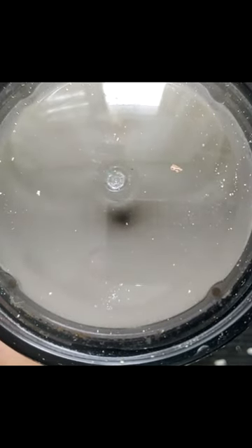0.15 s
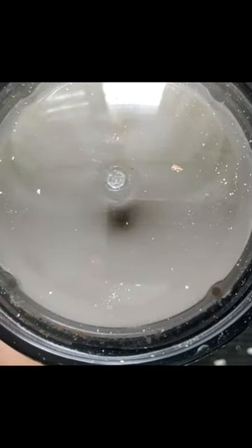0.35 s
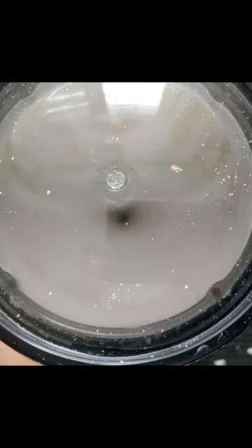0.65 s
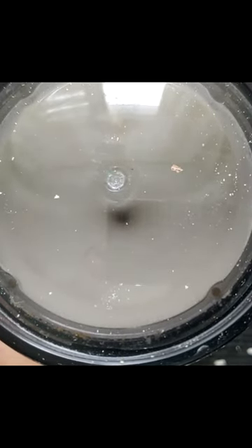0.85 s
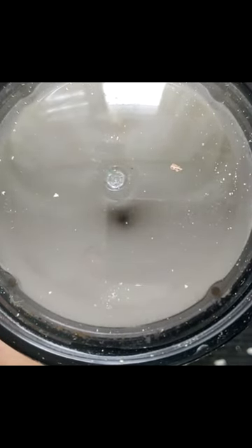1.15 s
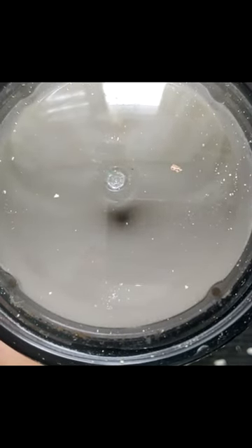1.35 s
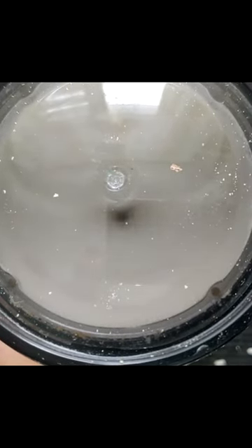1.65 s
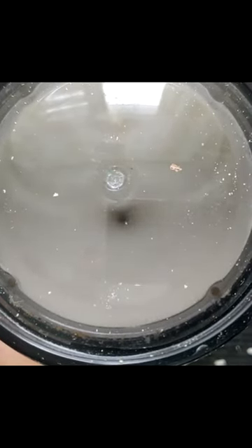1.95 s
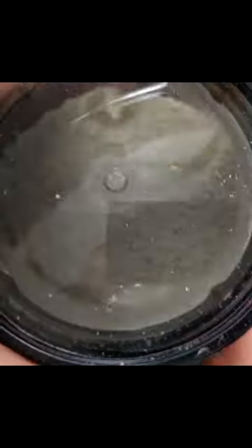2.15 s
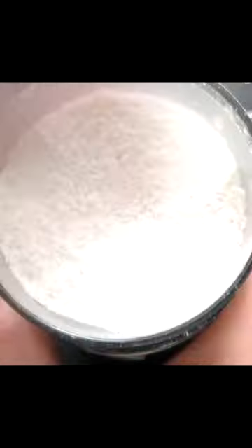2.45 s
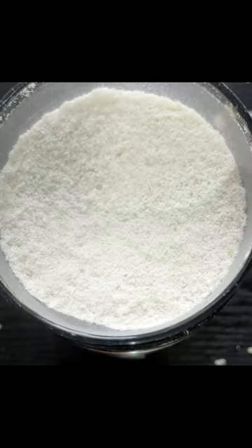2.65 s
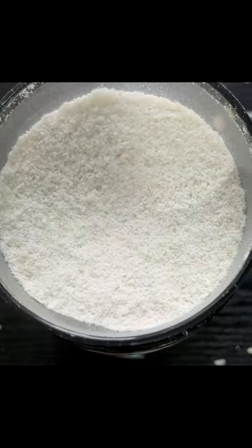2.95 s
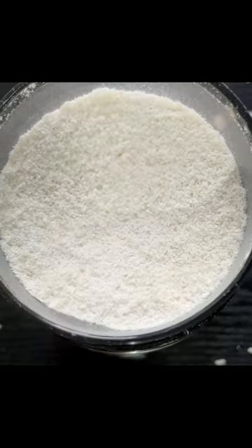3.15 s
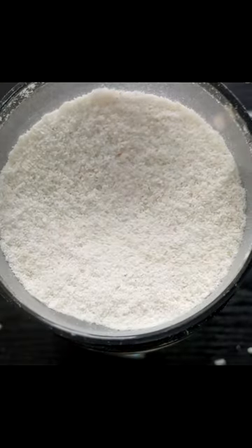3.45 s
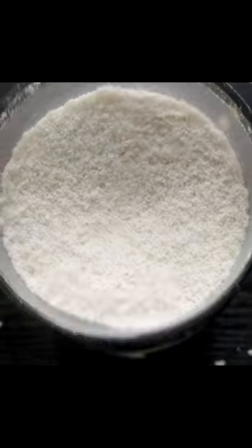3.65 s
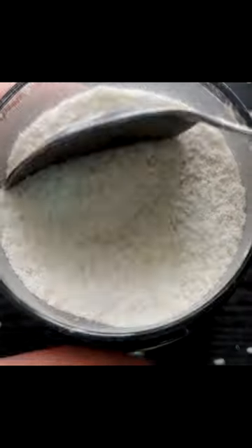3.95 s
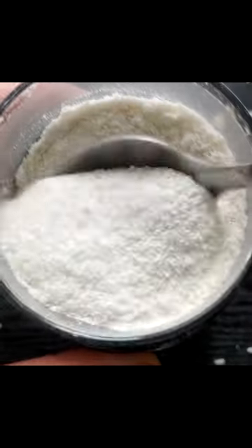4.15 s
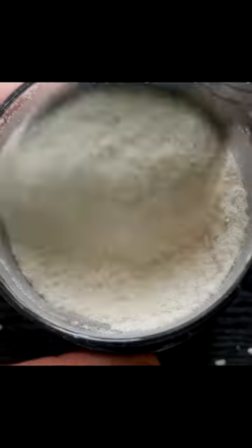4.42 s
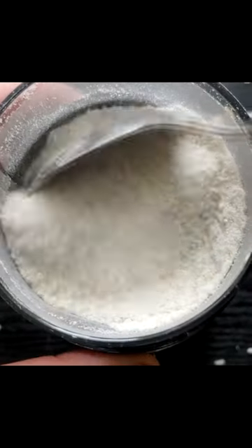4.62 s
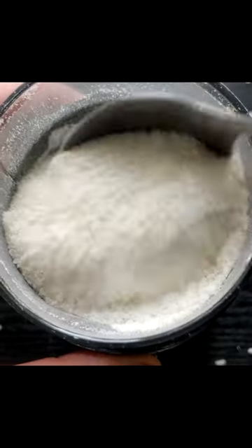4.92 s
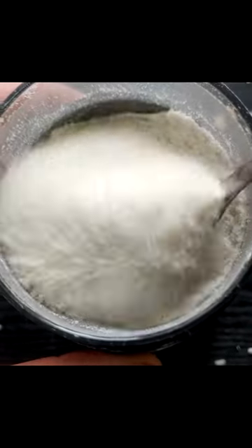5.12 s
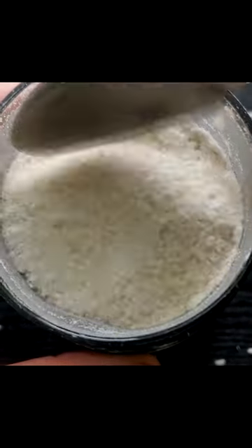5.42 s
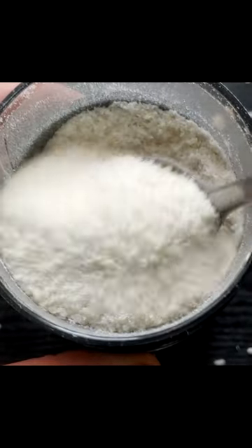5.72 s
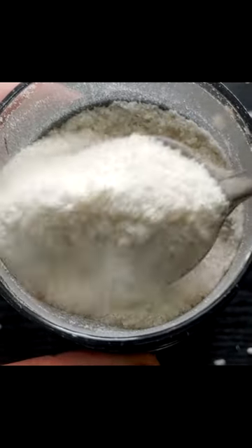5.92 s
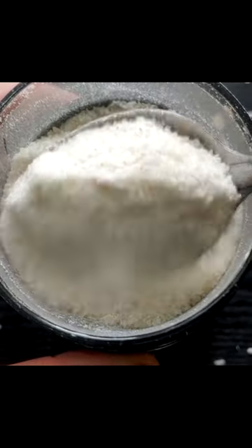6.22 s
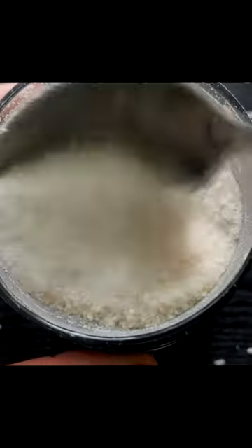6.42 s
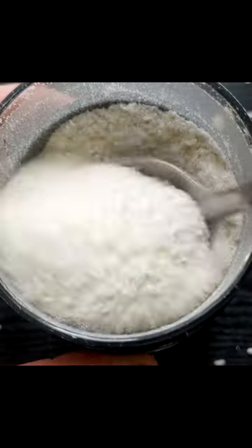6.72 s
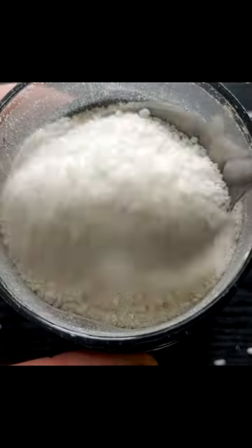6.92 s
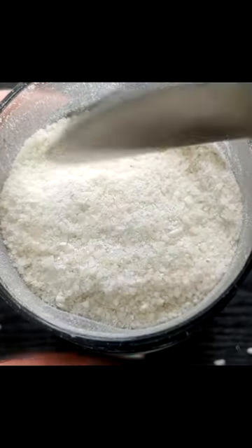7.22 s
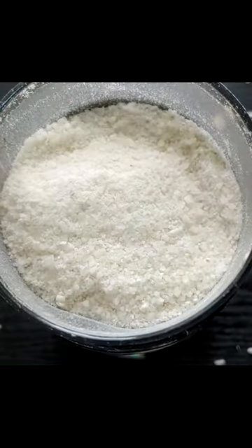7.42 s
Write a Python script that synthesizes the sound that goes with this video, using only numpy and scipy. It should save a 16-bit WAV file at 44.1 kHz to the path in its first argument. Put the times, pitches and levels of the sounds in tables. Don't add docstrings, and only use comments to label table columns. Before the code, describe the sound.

A dense, buzzing grinder full of dry grain runs from the start in a quiet room, steady with a slightly wavering motor pitch, and stops suddenly. One sharp click of the lid catch, small handling touches, a brief lid scrape and a solid plastic clack on the table come next. Then sparse, soft spoon strokes and small dry knocks in a powder-filled cup, recorded close in stereo, with a faint low drone beneath.

```python
import sys
import numpy as np
from scipy import signal
from scipy.fft import rfft, irfft
from scipy.io import wavfile
from scipy.ndimage import uniform_filter1d

SR = 44100
rng = np.random.default_rng(int(sys.argv[2]) if len(sys.argv) > 2 else 0)


def transcribe(signal):
    frames = np.atleast_2d(signal).T
    limited = np.clip(frames, -1, 1)
    pcm = np.round(limited * 32767).astype(np.int16)
    wavfile.write(sys.argv[1], SR, pcm)


def linear_from_db(decibels):
    return 10 ** (np.asarray(decibels, float) / 20)


N = 334278

# freq_hz, density_db [dB per Hz]
AIR_SPECTRUM = [(20, -25.5), (50, -14), (90, -12.5), (160, -22), (300, -22.5), (540, -18), (1120, -25.5),
                (1550, -29), (1900, -37.5), (2700, -39), (4500, -49.5), (7000, -57.5), (10600, -51.5),
                (11800, -75)]
# freq_hz, likeness [-1 to 1]
AIR_LIKENESS = [(60, 0.61), (180, 0.94), (550, -0.13), (1650, -0.28), (4970, -0.4), (15000, 0.4)]
# freq_hz, pan_db
AIR_PAN = [(60, 1), (180, 1), (550, -1), (1650, 3), (4970, 5), (15000, 2)]
# time_s, level_db
ROOM_LEVEL = [(0, -56.5), (2.2, -59.5), (2.66, -60.5), (2.7, -69.5), (7.58, -70)]
# freq_hz, width_hz, level_db [over the air], steady_share [factor beside the fuzz of 1]
DRONE = [(46.08, 12, -15.5, 0.28), (116.5, 8.9, -7, 1.9), (205.5, 20, -10, 0.23)]
# freq_hz, width_hz, gain_db
INLET = [(7330, 460, -18.5), (9700, 2700, 7), (12400, 400, -23.5), (14700, 350, -14)]

# time_s, shaft_hz, whine_db
MOTOR_RUN = [(0, 251.3, -35), (.12, 247.2, -32.5), (.19, 253.2, -34), (.27, 244.6, -34.5),
             (.37, 243.9, -35), (.48, 244.1, -40.5), (.59, 250.7, -33.5), (.66, 244.9, -37),
             (.81, 251.5, -34.5), (.97, 244.5, -35.5), (1.01, 244, -39.5), (1.08, 249.3, -34),
             (1.33, 249, -34), (1.42, 246.3, -36), (1.8, 247.3, -36), (1.9, 243.9, -34), (1.97, 246.6, -35),
             (2.05, 242, -37)]
# order, level_db [over whine], start_db, pan_db, left_lead_rad, waver_db
SHAFT_ORDERS = [(1, -2.5, -1.5, -11.5, 0.64, 0.8), (2, 5.5, -7.5, 0.6, 0.91, 1.5),
                (3, -6, -4, 1.5, 0.94, 4), (4, -3, -6, 9, 0.22, 2.5), (5, 7, -4.5, 5, 0.86, 1),
                (6, -3, 2, 1, 0.16, 3.5)]
# freq_hz, density_db [dB per Hz]
GRAIN_SPECTRUM = [(20, -41.5), (65, -35.5), (108, -24), (160, -35.5), (210, -19.5), (300, -11), (450, -8),
                  (560, -14.5), (1000, -12), (1230, -3), (1560, -7), (2560, -10), (3300, -23), (4290, -62)]
# freq_hz, density_db [dB per Hz]
GRIT_SPECTRUM = [(2000, -30), (3300, -2.5), (3550, 1), (3820, 5), (4300, -12), (4900, -23), (5450, -13.5),
                 (5850, -26), (6250, -13.5), (7000, -23), (9500, -14), (11500, -19.5), (13600, -22.5),
                 (14400, -23.5), (15100, -21), (15700, -21.5)]
# freq_hz, width_hz, gain_db
HOUSING_MODES = [(600, 77, 10.5), (698, 55, 6), (848.5, 140, 7.5), (1120, 220, -2.5), (1380, 260, 4),
                 (1690, 60, 4.5), (1880, 190, 4), (2093, 34, 7), (2547, 100, 7)]
# freq_hz, likeness [0-1]
CHURN_LIKENESS = [(60, .97), (170, .8), (320, .97), (700, .94), (900, .8), (1250, .93), (1600, .65),
                  (2000, .75), (2280, .15), (2700, .6), (3200, .6), (3500, .2), (3820, .9), (4400, .2),
                  (6300, .55), (7200, .2), (9000, .4), (14500, .45)]
# freq_hz, lead_rad
CHURN_LEAD_RAD = [(60, .1), (250, .5), (350, .2), (700, .6), (1400, .4), (1800, 1.7), (2250, 0),
                  (2500, -3.3), (2900, -.7), (3400, -3), (3800, -5), (4500, -4.8), (6300, -7), (9000, -5.3),
                  (15000, -6.3)]
# freq_hz, pan_db
CHURN_PAN_DB = [(60, -11), (170, -6.5), (250, 0.5), (330, 4.5), (900, 5.5), (1400, -0.5), (2400, 10.5),
                (3100, 0.55), (3800, -3), (5000, -10.5), (6200, 11), (7200, 1), (15000, -3.5)]

# freq_hz, width_hz, level_db
LID_MODES = [(141, 34, 3.5), (252, 52, 8), (416, 170, 5.5), (560, 31, -0.5), (700, 39, 0.5), (960, 36, 1),
             (1310, 70, -11), (1750, 280, -14), (2525, 69, -15), (3030, 120, -26), (3770, 100, -49)]
# freq_hz, width_hz, level_db
CUP_MODES = [(361, 45, -5.5), (650, 75, -0.5), (927, 134, -4.5), (1200, 185, -5), (1490, 190, -1),
             (1970, 120, -12), (2350, 110, -14), (3500, 250, -53)]
# freq_hz, width_hz, level_db
PLASTIC_MODES = [(229, 130, 7.5), (560, 240, 9.5), (1192, 260, 5), (1550, 140, 5), (2005, 240, 9.5),
                 (2740, 38, -27.5), (3640, 130, -7.5)]
# freq_hz, level_db
TICK_SPECTRUM = [(300, -33.5), (1500, -5), (3500, -3), (5500, -6), (7500, -11), (9500, -12), (12000, -17),
                 (13500, -24), (15000, -38.5), (17000, -59.5)]

# time_s, effort_db, grit_db [over effort], rise_s, fall_s
LID_SCRAPES = [
    (2.708, -29.5, -39, .022, 0.12),
    (2.835, -34, -32, 0.032, 0.073),
    (2.865, -40, -30, .05, 0.072),
]
# time_s, effort_db, favoured_hz, rise_s, fall_s
COARSE_RUBS = [
    (2.397, -45.5, 1200, 0.0049, 0.035),
    (2.445, -53.5, 432, .04, 0.088),
    (3.83, -72, 350, .2, 0.084),
    (4.16, -69, 1510, 0.062, 0.042),
    (4.654, -58, 352, .02, .07),
    (4.66, -65, 3100, 0.026, 0.051),
]
# time_s, effort_db, favoured_hz, rise_s, fall_s
FINE_RUBS = [(3.084, -68, 254, 0.063, 0.037), (4.1, -75, 1500, 0.092, .08), (4.22, -69.5, 1400, 0.016, .08),
             (4.352, -54.5, 750, 0.032, 0.038), (4.735, -57, 990, 0.064, 0.047),
             (5.02, -48, 750, .025, 0.064), (5.085, -56.5, 700, .07, 0.096),
             (5.175, -56.5, 1256, 0.069, 0.083), (5.47, -69, 910, 0.087, 0.087),
             (5.585, -65.5, 1510, 0.077, 0.072), (5.616, -45.5, 560, 0.013, 0.078),
             (5.71, -63, 600, .1, 0.082), (5.835, -58.5, 694.4, .08, 0.057),
             (6.665, -59.5, 560, .08, 0.066), (6.74, -71, 1500, 0.092, 0.12),
             (6.84, -61, 650, 0.022, 0.043)]
# time_s, low_db, upper_db, rise_s, fall_s
TABLE_THUDS = [(2.255, -70, -71, 0.01, 0.17), (2.413, -56.5, -66, 0.071, 0.23),
               (2.711, -63, -61, 0.061, 0.6), (2.899, -75, -78, 0.43, .05),
               (3.5734, -32, -37.5, 0.0029, 0.069), (3.632, -57.5, -62.5, 0.025, 0.2),
               (3.953, -62, -65, 0.073, 0.057), (4.652, -57.5, -57, 0.046, 0.23),
               (5.15, -61.5, -65, 0.18, 0.072), (5.646, -54.5, -61.5, .065, 0.4),
               (6.712, -66.5, -68.5, 0.35, 0.33), (7.299, -57, -59.5, .04, 0.12)]
# time_s, peak_db, favoured_hz, tick_db [over peak], decay_ms
SNAPS = [
    (2.3552, -42, 1506, -3.5, 29),
    (2.3659, -29, 1310, -6.5, 95),
    (2.3799, -4.5, 1727, -10, 16),
    (2.385, -31, 1640, -19, 144),
    (2.3901, -21.5, 1420, -10.5, 40),
    (7.2895, -42, 2660, -30, 38),
]
# time_s, peak_db, favoured_hz, tick_db [over peak], decay_ms
CUP_LANDINGS = [
    (3.547, -46, 1380, -33, 46),
    (3.5554, -25, 600, -11.5, 46),
    (3.5667, -4, 1113, -11.5, 12),
    (3.571, -15, 620, -32.5, 21),
    (3.5786, -29.5, 700, -15, 8),
]
# time_s, peak_db, favoured_hz, tick_db [over peak], decay_ms
RIM_KNOCKS = [
    (2.6958, -46, 900, -35, 15),
    (2.7063, -23.5, 800, -35, 9.7),
    (2.7141, -24.5, 910, -38, 9.7),
    (2.8391, -30, 900, -35, 9.2),
    (2.88, -40, 950, -35, 17),
]
# time_s, peak_db, favoured_hz, tick_db [over peak]
FINGER_TAPS = [
    (2.444, -41, 360, -25),
    (2.477, -48.5, 550, -21),
    (3.023, -61, 282, -34),
    (3.061, -66.5, 244, -42),
    (3.289, -59, 560, -15),
]
# time_s, peak_db, favoured_hz, tick_db [over peak]
WALL_TAPS = [(3.93, -47.5, 1490, -34), (4.154, -62, 208, -22), (4.214, -57, 654, -37),
             (4.346, -65, 700, -33), (4.659, -47.5, 640, -25), (4.71, -52, 840, -39),
             (5.023, -50, 654, -34), (5.087, -55, 695, -37), (5.162, -56, 1500, -32),
             (5.279, -78, 202, -11.5), (5.519, -50.5, 346, -38), (5.612, -42, 484, -35),
             (5.622, -41, 616, -21), (5.727, -47, 554, -38), (5.805, -58, 646, -35), (5.831, -58, 740, -33),
             (6.556, -49, 361, -39), (6.623, -47.5, 358, -42), (6.665, -55, 1400, -37),
             (6.689, -53.5, 1550, -37), (6.818, -53, 373, -40), (7.059, -55, 250, -22),
             (7.276, -55, 1516, -32), (7.288, -38, 1510, -35)]
# time_s, peak_db, favoured_hz, tick_db [over peak], decay_ms
EDGE_KNOCKS = [(4.3486, -52, 1270, -25, 20), (4.6451, -41.5, 372, -26, 11), (4.723, -45, 900, -32, 12),
               (4.7359, -36.5, 1050, -42, 8.4), (5.0072, -46, 800, -26, 12), (5.0193, -52, 1400, -30, 10),
               (5.0243, -48, 700, -30, 12), (5.6103, -31.5, 616, -14, 18), (5.6306, -36, 700, -15, 19),
               (6.6505, -47, 605, -30, 13), (6.6615, -41, 560, -28, 16), (7.288, -46, 910, -15, 25.5)]
# time_s, level_db, freq_hz, length_ms
BRUSHED_MODES = [(2.886, -53.5, 289, 54), (3.059, -54, 243, 57), (4.488, -71.5, 1390, 70),
                 (5.163, -87, 4350, 56), (5.271, -81, 3800, 19), (5.521, -62.5, 1490, 24),
                 (5.596, -51, 356, 28), (5.812, -90, 4450, 59), (6.558, -63, 1500, 18),
                 (6.65, -91, 5800, 25), (6.81, -59.5, 372, 56), (6.812, -82, 4364, 12),
                 (6.826, -89, 4330, 15), (4.346, -80, 4540, 20), (4.49, -92, 3500, 63),
                 (5.629, -70, 3700, 14), (5.628, -86, 5640, 12), (3.585, -73, 2710, 33),
                 (7.056, -59, 227, 28), (7.287, -47.5, 356, 16), (7.289, -56, 657, 24)]
# time_s, level_db, rise_s, fall_s
DUST_PUFFS = [(2.459, -80, .04, .05), (2.565, -78.5, .03, .04), (2.77, -70, .03, 0.038),
              (2.85, -75, 0.055, 0.099), (4.66, -69, 0.028, .04), (5.82, -74, .02, 0.034),
              (2.484, -69, .006, .006), (4.722, -78, .006, .008), (5.028, -83.5, .02, .015),
              (5.497, -77, .008, .008), (5.882, -78.5, .008, .01), (7.292, -74.5, .006, 0.034)]
# time_s, level_db, rise_s, fall_s
GRIT_SPRAYS = [(2.372, -70, .006, 0.0091), (2.39, -67, .01, 0.031), (2.478, -73, .01, .015),
               (2.57, -80, .05, 0.055), (4.16, -84, 0.022, .02), (4.354, -82, .015, 0.016),
               (4.66, -70, .03, 0.032), (5.025, -87, .03, 0.019), (5.6, -82, .015, 0.011),
               (5.632, -86, .015, 0.027), (7.292, -78.5, .006, 0.025)]

GRIT_SPECTRUM_DB, CHURN_DB = -24, -29
RUN_S, SETTLE_S = 2.17, .4
FADE_START_S, GLIDE_HZ_PER_S, WHINE_LOSS_DB_PER_S = 2.0367, 120, 251
FADE_S, FADE_DB, FADE_BEND = 0.13, -59, 4.4
EDGE_DB, SHOULDER_DB = -40, -11.5
LID_HZ, TABLE_HZ, TABLE_UPPER_HZ = 950, 57.5, 102
COARSE_GRIT_DB, FINE_GRIT_DB = -6, -19
TAP_DECAY_MS, TICK_LAG_S = 48, .0008
DUST_HZ, SPRAY_HZ, PUFF_WIDTH_HZ = 9500, 5130, 2200


def evened(x):
    return x / np.sqrt(np.mean(x ** 2) + 1e-20)


def read(points, hz):
    f, value = np.transpose(points)
    return np.interp(np.log(hz + 1), np.log(f + 1), value)


def unroll(rows):
    s, *columns = np.transpose(rows)
    t = np.arange(s[0], s[-1], 1 / SR)
    return round(s[0] * SR), [np.interp(t, s, c) for c in columns]


def add(mix, at, sound):
    part = mix[:, at:at + sound.shape[1]]
    part += sound[:, :part.shape[1]]


def panned(db):
    return linear_from_db(np.array([db / 2, -db / 2]))


def bumps(modes, hz):
    return sum(db / (1 + (2 * (hz - f) / w) ** 2) for f, w, db in modes)


def dull(x, hz):
    return signal.sosfilt(signal.butter(N=3, Wn=hz, fs=SR, output="sos"), x)


def resonate(x, hz, width):
    r = np.exp(-np.pi * width / SR)
    return 2 * signal.lfilter([1 - r], [1, -r * np.exp(2j * np.pi * hz / SR)], x).real


def resonate_twice(x, hz, width):
    return resonate(resonate(x, hz, width), hz, width)


def drift(n, hz):
    knots = rng.standard_normal(int(n / SR * 60) + 2)
    return evened(np.interp(np.arange(n) * hz / SR, np.arange(len(knots)), knots))


def stroke(s, rise, fall):
    return [(s - rise, EDGE_DB), (s - rise / 2, SHOULDER_DB), (s, 0),
            (s + fall / 2, SHOULDER_DB), (s + fall, EDGE_DB)]


def hiss(n, shape_db, same, lead, pan_db, patchy_db):
    hz = np.fft.rfftfreq(2048, 1 / SR)
    a, b, c, d, patches = rng.standard_normal((n // 512 + 5, 1025, 5)).T
    patches = uniform_filter1d(patches, size=16, axis=0)
    patches = evened(uniform_filter1d(patches, size=4, axis=1))
    alike = np.clip(read(same, hz), -1, 1)[:, None]
    left = a + 1j * b
    shared = alike * left * np.exp(-1j * read(lead, hz))[:, None]
    right = shared + np.sqrt(1 - alike ** 2) * (c + 1j * d)
    level = linear_from_db(shape_db(hz)[:, None] + patchy_db * patches)
    z = np.array([left, right]) * panned(read(pan_db, hz))[:, :, None] * level
    return evened(signal.istft(z, nperseg=2048, noverlap=1536)[1][:, :n])


def air_db(hz):
    return read(AIR_SPECTRUM, hz) + 0.72 * bumps(INLET, hz)


def room():
    t = np.arange(N) / SR
    air = hiss(N, air_db, AIR_LIKENESS, [(0, 0.005), (1e4, 0.0044)], AIR_PAN, patchy_db=2.76)
    drone = np.zeros(N)
    for hz, width, db, steady in DRONE:
        fuzz = evened(resonate_twice(rng.standard_normal(N), hz, width))
        drone += linear_from_db(db) * (fuzz + steady * np.sin(2 * np.pi * hz * t))
    return (air + drone * panned(2)[:, None]) * linear_from_db(np.interp(t, *np.transpose(ROOM_LEVEL)))


def sift(s, db, rise, fall, hz):
    at, (level_db,) = unroll(stroke(s, rise, fall))
    dust = rng.standard_normal(size=(2, SR // 4))[:, :len(level_db)]
    return at, evened(resonate_twice(dust, hz, PUFF_WIDTH_HZ)) * linear_from_db(db + level_db)


def pip(row):
    s, db, hz, length_ms = row
    t = np.arange(0, length_ms / 1000, 1 / SR)
    uneven = linear_from_db(4.7 * drift(SR // 10, 82)[:len(t)])
    tone = np.sin(2 * np.pi * hz * t) * np.sin(np.pi * np.sqrt(t / t[-1])) ** 2
    return round(s * SR), linear_from_db(db) * tone * uneven * panned(3.7)[:, None]


def thud(rows):
    at, (low_db, upper_db) = unroll(rows)
    n = len(low_db)
    low = np.sqrt(2) * np.sin(2 * np.pi * TABLE_HZ * np.arange(n) / SR)
    upper = evened(resonate_twice(rng.standard_normal(SR)[:n], TABLE_UPPER_HZ, 60))
    rock = (low * linear_from_db(low_db) + upper * linear_from_db(upper_db)) * signal.windows.tukey(n, .1)
    return at, rock * panned(-6.5)[:, None]


def gritty(x, upper, width, upper_hz):
    return resonate_twice(x, 3430, width) + upper * resonate_twice(x, upper_hz, 2 * width)


def friction(rows, body, per_s, spread_db, pan_db, apart, reach, grit_trim_db):
    at, (effort_db, grit_db, hz) = unroll(rows)
    n = len(hz)
    chance, size, sign = rng.random(size=(3, SR))[:, :n]
    slips = (chance < per_s / SR) * linear_from_db(-spread_db * np.log(size + 0.0033)) * np.sign(sign - .5)
    slips = evened(slips) + apart * rng.standard_normal(size=(2, SR))[:, :n]
    ring, power = 0, 0
    for k, (f, w, db) in enumerate(body):
        near = linear_from_db(db - reach * abs(np.log2(f / hz)))
        ring = ring + (-1) ** k * near * resonate(slips, f, w) / np.sqrt(w)
        power = power + near ** 2
    ring = evened(dull(ring / np.sqrt(power), 3200))
    grit = evened(dull(gritty(slips, upper=0.21, width=640, upper_hz=9800), 13000))
    sound = ring * panned(pan_db)[:, None] + grit * linear_from_db(grit_db + grit_trim_db)
    return at, sound * linear_from_db(effort_db) * signal.windows.tukey(n, .06)


def knock(row, body, pan_db, reach, rattle, soft_hz, late, damp=1, inlet=.1):
    s, db, hz, tick_db, decay_ms = row
    t = np.arange(4400) / SR
    hit_s = t[40]
    noise = rng.standard_normal((3, len(t)))
    clatter = rattle * (noise[0] + 0.6 * noise[1:]) * linear_from_db(-60 * t * 1000 / decay_ms)
    blow = clatter * (t > hit_s) + (t == hit_s)
    ring = 0
    for k, (f, w, d) in enumerate(body + [(hz, 130, 0)]):
        near = linear_from_db(d - reach * abs(np.log2(f / hz)))
        ring = ring + (-1) ** k * near * resonate(blow, f, damp * w) / w
    ring = dull(ring, soft_hz)
    f = np.fft.rfftfreq(len(t), 1 / SR)
    colour = linear_from_db(read(TICK_SPECTRUM, f) + inlet * bumps(INLET, f)) * np.exp(-2j * np.pi * f * TICK_LAG_S)
    tick = irfft(rfft(blow * linear_from_db(-60 * t / 0.014)) * colour, len(t))
    sound = ring / abs(ring).max() * panned(pan_db)[:, None] + linear_from_db(tick_db) * tick / abs(tick).max()
    sound[1] = np.roll(sound[1], round(1.5 * pan_db)) * (t > 0)
    return round((s + late - hit_s) * SR), linear_from_db(db) * sound


def churn_db(hz):
    grain = read(GRAIN_SPECTRUM[:-1], hz)
    grit = read(GRIT_SPECTRUM, hz) + GRIT_SPECTRUM_DB
    return np.where(hz < GRIT_SPECTRUM[1][0], grain, grit) + bumps(HOUSING_MODES + INLET, hz)


def grinder():
    t = np.arange(0, RUN_S, 1 / SR)
    n = len(t)
    s, shaft_hz, whine_db = np.transpose(MOTOR_RUN)
    since_fade = np.maximum(t - FADE_START_S, 0)
    hz = np.interp(t, s, shaft_hz) - GLIDE_HZ_PER_S * since_fade
    fade_db = FADE_DB * (since_fade / FADE_S) ** FADE_BEND
    turns = 2 * np.pi * np.cumsum(hz * (1 + .002 * drift(n, 45))) / SR
    out = hiss(n, churn_db, CHURN_LIKENESS, CHURN_LEAD_RAD, CHURN_PAN_DB, patchy_db=0.64)
    out = out * linear_from_db(CHURN_DB + 5.5 + 0.5 * drift(n, 12)) * (1 + 0.097 * np.cos(turns))
    base_db = np.interp(t, s, whine_db) - WHINE_LOSS_DB_PER_S * since_fade
    for order, db, start_db, pan_db, lead, waver_db in SHAFT_ORDERS:
        line = np.cos(round(order) * turns + 2 * np.pi * rng.random() + np.array([[lead], [0]]))
        level_db = base_db + db + start_db * np.exp(-(t / SETTLE_S) ** 2)
        out += np.sqrt(2) * line * panned(pan_db)[:, None] * linear_from_db(level_db + waver_db * drift(n, 30))
    return 0, out * linear_from_db(fade_db)


def scene():
    mix = room()
    for row in DUST_PUFFS:
        add(mix, *sift(*row, DUST_HZ))
    for row in GRIT_SPRAYS:
        add(mix, *sift(*row, SPRAY_HZ))
    for row in BRUSHED_MODES:
        add(mix, *pip(row))
    for s, low_db, upper_db, rise, fall in TABLE_THUDS:
        add(mix, *thud([(t, low_db + d, upper_db + d) for t, d in stroke(s, rise, fall)]))
    for s, db, grit_db, rise, fall in LID_SCRAPES:
        rows = [(t, db + d, grit_db, LID_HZ) for t, d in stroke(s, rise, fall)]
        add(mix, *friction(rows, LID_MODES, per_s=650, spread_db=3.5, pan_db=2.0, apart=1.0,
                           reach=6.4, grit_trim_db=-3.5))
    for rubs, grit_db in (COARSE_RUBS, COARSE_GRIT_DB), (FINE_RUBS, FINE_GRIT_DB):
        for s, db, hz, rise, fall in rubs:
            rows = [(t, db + d, grit_db, hz) for t, d in stroke(s, rise, fall)]
            add(mix, *friction(rows, CUP_MODES, per_s=2000, spread_db=2, pan_db=4.5, apart=0.66,
                               reach=4.7, grit_trim_db=-8))
    for row in SNAPS:
        add(mix, *knock(row, PLASTIC_MODES, pan_db=7.0, reach=5.2, rattle=0.057, soft_hz=3010, late=0))
    for row in CUP_LANDINGS:
        add(mix, *knock(row, PLASTIC_MODES, pan_db=-7.5, reach=6.7, rattle=0.12, soft_hz=3000, late=0))
    for row in FINGER_TAPS + WALL_TAPS:
        add(mix, *knock((*row, TAP_DECAY_MS), CUP_MODES, pan_db=3.5, reach=3.9, rattle=0.54,
                        soft_hz=2500, late=0.0015, inlet=.9))
    for row in RIM_KNOCKS:
        add(mix, *knock(row, LID_MODES, pan_db=4.5, reach=5, rattle=0.086, soft_hz=1950, late=0, damp=3.1))
    for row in EDGE_KNOCKS:
        add(mix, *knock(row, CUP_MODES, pan_db=4.0, reach=5.4, rattle=0.16, soft_hz=2320, late=0,
                        damp=2.6, inlet=1.0))
    add(mix, *grinder())
    return mix


def low_pass(x):
    return signal.sosfilt(signal.butter(12, 15770, fs=SR, output="sos"), x)


def record(dry):
    limited = 0.48 * np.tanh(dry / 0.51)
    return low_pass(limited)


dry = scene()
out = record(dry)
transcribe(out)
```